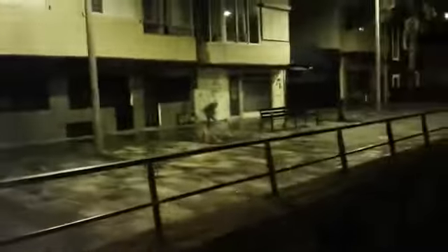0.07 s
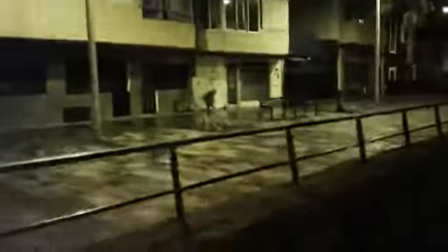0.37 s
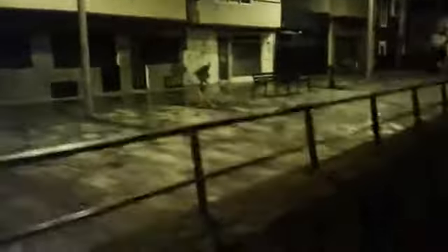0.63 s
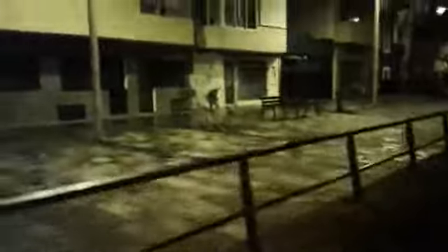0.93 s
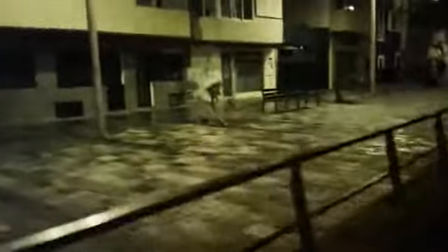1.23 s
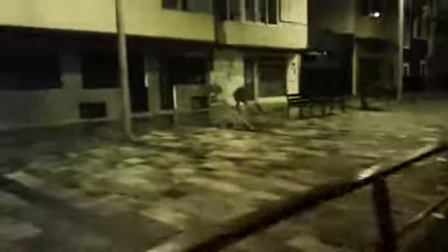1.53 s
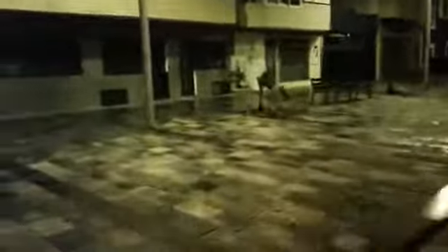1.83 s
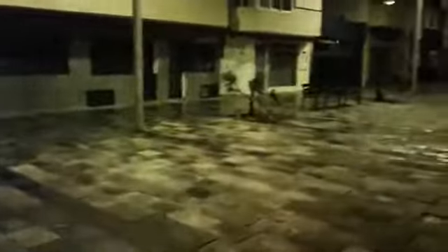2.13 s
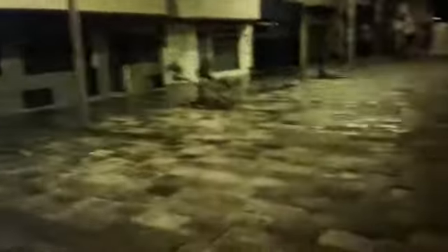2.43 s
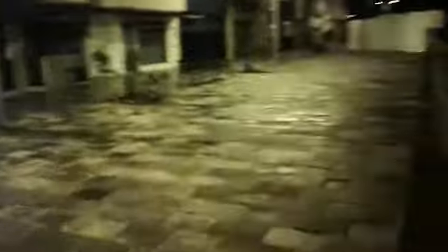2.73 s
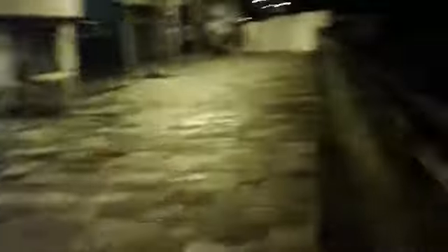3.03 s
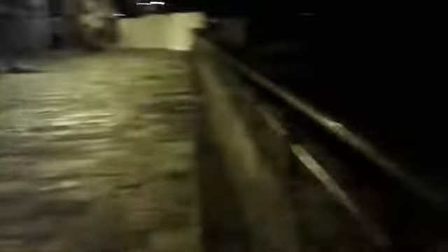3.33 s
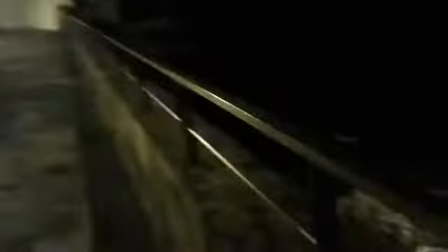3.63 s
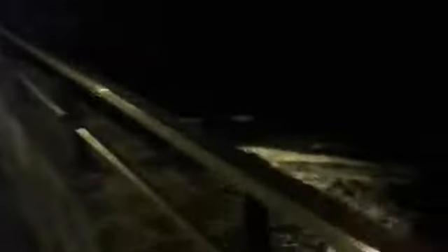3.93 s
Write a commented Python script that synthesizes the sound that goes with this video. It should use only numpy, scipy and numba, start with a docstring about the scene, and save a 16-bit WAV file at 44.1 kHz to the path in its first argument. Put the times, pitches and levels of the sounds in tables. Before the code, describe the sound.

Gusts of wind rumble and bump against the microphone, with sea surf rushing behind.

```python
"""A seaside promenade at night: wind buffets a camera's microphone over the wash of surf.
At first the surf is loudest, broken by brief gusts; each eddy is a low thump, brighter when fast.
Just before halfway the wind picks up while the surf sinks.
Near the end the wind tears hardest and the surf swells again;
the camera's gain control ducks the surf under the strong blows."""
import sys
import numpy as np
from scipy import signal
from scipy.fft import rfft, irfft, next_fast_len
from scipy.io import wavfile
from scipy.ndimage import uniform_filter1d, minimum_filter1d, map_coordinates
from numba import njit

SR = 44100
rng = np.random.default_rng(int(sys.argv[2]) if len(sys.argv) > 2 else 0)


def transcribe(signal):
    """Save signal, clipped to [-1, 1], as a 16-bit WAV file at the path in sys.argv[1]."""
    frames = np.atleast_2d(signal).T
    limited = np.clip(frames, -1, 1)
    pcm = np.round(limited * 32767).astype(np.int16)
    wavfile.write(sys.argv[1], SR, pcm)


N = 176400  # 4 s


def wind_buffeting(octaves_per_db=0.1412):
    """Turbulent pressure at the microphone; the strongest flow sets the corner, swells are brighter."""
    flow_power, flow_weighted_hz = steady_flow(octaves_per_db)
    eddy_power, eddy_weighted_hz, kicks = eddies()
    power = flow_power + eddy_power
    mean_corner_hz = (flow_weighted_hz + eddy_weighted_hz) / power
    ragged_db = 2.5 * wobble(rate_hz=220)  # fine break-up of all the flow
    corner_hz = mean_corner_hz * 2 ** (octaves_per_db * ragged_db)
    step_rad = np.minimum(2 * np.pi * corner_hz / SR, 0.5)
    turbulence = np.sqrt(power) * amp(ragged_db) * rng.standard_normal(N)
    drive = 2 * (turbulence + kicks) / np.sqrt(step_rad)  # level independent of corner
    return moving_lowpass(drive, step_rad, damping=1.407, stages=2)


# Steady wind on the microphone: time_s, level_db, corner_hz
FLOW_CURVE = [(0, -42, 300), (.07, -46, 300), (.12, -25, 280), (.26, -29, 280), (.34, -45.5, 250),
              (.8, -42, 250), (1.0, -43, 248), (1.15, -21, 258), (1.3, -44.5, 250), (1.63, -53, 250),
              (1.68, -20, 318), (2.1, -23.5, 268), (2.38, -21.5, 280), (2.52, -29.5, 252),
              (2.75, -20.5, 306), (2.92, -28.5, 283), (3.02, -21.5, 353), (3.25, -24, 352),
              (3.46, -13.5, 770), (3.68, -15, 645), (3.8, -20, 526), (3.85, -29, 285), (4, -20, 320)]


def steady_flow(octaves_per_db, gain_db=0.5):
    """Airflow with random swells: its power and power-weighted corner."""
    level_db, corner_hz = curves(FLOW_CURVE)
    swell_db = 3 * wobble(rate_hz=35)
    power = amp(gain_db + level_db + swell_db) ** 2
    return power, power * corner_hz * 2 ** (octaves_per_db * swell_db)


# Eddies hitting the microphone: centre_s, length_s, level_db, corner_hz
EDDY_HITS = [(.091, 0.002, -0.5, 960), (.107, 0.0089, -9, 786), (0.126, 0.0088, -6.5, 780),
             (0.136, 0.0034, -10, 660), (0.148, .005, -7.5, 350), (0.181, 0.013, -10, 438),
             (0.214, 0.0095, -16.5, 450), (0.252, 0.028, -16, 400), (0.636, .012, -14.5, 345),
             (0.849, 0.011, -15.5, 500), (.865, 0.0057, -11.5, 516), (0.888, 0.012, -15, 338),
             (1.069, 0.0027, -9.5, 650), (1.075, 0.0029, -3.5, 890), (1.096, 0.0079, -8, 780),
             (1.152, 0.003, -7.5, 398), (1.16, 0.0092, -10, 412), (1.198, .008, -15.5, 303),
             (1.222, 0.022, -11.5, 420), (1.328, 0.021, -27.5, 300), (1.665, 0.01, -9.5, 570),
             (1.71, 0.045, -12, 546), (1.758, 0.0088, -10, 720), (1.786, 0.02, -11, 486),
             (1.827, 0.0049, -10.5, 556), (1.842, 0.0037, -9, 634), (1.912, 0.002, 3, 1460),
             (1.918, 0.0074, -4.5, 840), (1.955, .009, -3, 1580), (1.973, 0.014, -8, 1210),
             (2.031, 0.037, -11, 780), (2.056, 0.02, -13.5, 646), (2.098, 0.0065, -16, 712),
             (2.171, 0.01, -11, 443), (2.199, 0.013, -16.5, 486), (2.238, 0.016, -13.5, 484),
             (2.294, 0.0082, -8.5, 680), (2.387, 0.051, -16.5, 530), (2.409, 0.0061, -4, 1160),
             (2.581, 0.0048, -10.5, 830), (2.607, 0.019, -21, 620), (2.644, 0.011, -17, 553),
             (2.71, 0.0055, -11, 730), (2.722, 0.0053, -7.5, 880), (2.762, 0.027, -18, 760),
             (2.778, .002, -5.5, 1540), (2.813, 0.02, -16, 600), (2.958, 0.011, -11, 716),
             (2.974, 0.0023, -9.5, 850), (2.997, 0.013, -11, 695), (3.016, 0.0047, -11.5, 666),
             (3.061, 0.0037, -12, 720), (3.126, 0.014, -11.5, 720), (3.141, 0.02, -10.5, 840),
             (3.198, .002, -10, 870), (3.219, .002, -10.5, 780), (3.283, 0.0029, -5, 905),
             (3.295, 0.011, -7, 1540), (3.315, 0.0057, -4.5, 900), (3.351, 0.0074, -2, 2060),
             (3.363, 0.0039, -5, 2070), (3.4, 0.018, -13, 880), (3.45, .012, 0.5, 1960),
             (3.479, 0.014, -2.5, 1050), (3.497, 0.013, -4.5, 2060), (3.511, 0.0065, -5, 1650),
             (3.559, .002, -6.5, 1100), (3.58, 0.012, -0.5, 1370), (3.596, 0.015, -6, 1510),
             (3.641, 0.021, -9.5, 970), (3.747, 0.046, -8.5, 1120), (3.773, 0.012, -14, 1000),
             (3.795, 0.023, -12.5, 805)]


def eddies(burst_gain_db=-3.5, kick_gain_db=-0.5):
    """Each eddy is a bell-shaped burst of turbulence with one pressure kick at its centre."""
    time_s = np.arange(N) / SR
    power, weighted_hz, kicks = np.zeros((3, N))
    for centre_s, length_s, level_db, corner_hz in EDDY_HITS:
        bell = np.exp(-(2 * (time_s - centre_s) / length_s) ** 2)
        burst_power = amp(burst_gain_db + level_db) ** 2 * bell
        power += burst_power
        weighted_hz += burst_power * corner_hz
        kicks[int(centre_s * SR)] = amp(kick_gain_db + level_db) * np.sqrt(2 * SR / corner_hz)
    return power, weighted_hz, kicks


# Whole surf: time_s, level_db
SURF_CURVE = [(0, -29.5), (.12, -32), (.22, -30), (.4, -34), (.75, -33.5), (.93, -32), (1.04, -31.5),
              (1.22, -34.5), (1.4, -39.5), (1.62, -40), (1.85, -40.5), (2.1, -48.5), (2.35, -44.5),
              (2.55, -49.5), (2.72, -47.5), (2.87, -44.5), (3.02, -49.5), (3.22, -45.5), (3.45, -41),
              (3.75, -38), (3.94, -38), (4, -41)]
# Extra gain on the surf's body: time_s, gain_db
BODY_CURVE = [(0, 1), (.5, -0.5), (1.1, -0.5), (1.6, 1.5), (2.2, 2), (2.9, 3), (3.4, 0), (3.9, -3)]
# Spectrum of the body: frequency_hz, density_db
BODY_SPECTRUM = [(30, -47), (80, -16), (200, -5.5), (400, -4.5), (800, -1), (1300, -2.5), (1900, -1.5),
                 (2700, -5.5), (3700, -7.5), (5000, -16), (7000, -18.5), (15000, -50)]
# Spectrum of the foam's fizz: frequency_hz, density_db
FIZZ_SPECTRUM = [(2000, -41), (5000, -22), (6400, -14.5), (7700, -2), (8900, 1.5), (10000, -2),
                 (11500, -10), (13500, -12), (15000, -15)]


def surf(body_gain_db=8, fizz_gain_db=1.5):
    """The wash of broken waves: a rushing body and the fizz of foam."""
    level_db, = curves(SURF_CURVE)
    extra_db, = curves(BODY_CURVE)
    body_db = body_gain_db + extra_db + 0.26 * wobble(rate_hz=12)
    body = amp(body_db) * patchy_noise(BODY_SPECTRUM, patchy_db=0.87)
    fizz_db = fizz_gain_db + 0.25 * wobble(rate_hz=22)
    fizz = amp(fizz_db) * patchy_noise(FIZZ_SPECTRUM, patchy_db=0.1)
    return amp(level_db) * (body + fizz)


def ducking(wind, threshold=0.48, slope=1.06, range_db=6.5, ahead_s=0.02, release_s=0.064):
    """Camera gain that drops just ahead of each strong wind peak and recovers smoothly."""
    excess = (np.abs(wind) / threshold) ** slope
    depth_nepers = np.log(np.clip(excess, 1, amp(range_db))) + 1e-12
    decay = np.arange(N) / SR / release_s
    held_nepers = np.exp(np.maximum.accumulate(np.log(depth_nepers) + decay) - decay)  # decaying peak hold
    width = int(ahead_s * SR)
    early_gain = minimum_filter1d(np.exp(-held_nepers), width, origin=-(width // 2))
    return uniform_filter1d(early_gain, width // 2)


def amp(db):
    """Decibels to gain."""
    return 10 ** (np.asarray(db) / 20)


def unit_rms(x):
    """Scale to rms 1."""
    return x / np.sqrt(np.mean(x ** 2) + 1e-20)


def curves(rows):
    """One value per sample for each column after the time."""
    time_s, *columns = np.transpose(rows)
    return [np.interp(np.arange(N) / SR, time_s, column) for column in columns]


def wobble(rate_hz):
    """A smooth curve through random knots."""
    return map_coordinates(rng.standard_normal(4096), [np.arange(N) * rate_hz / SR], mode="wrap")


def filtered(x, response):
    """Scale the spectrum of x by response(hz)."""
    size = next_fast_len(N + 8192)
    return irfft(rfft(x, size) * response(np.fft.rfftfreq(size, 1 / SR)), size)[..., :N]


def patchy_noise(spectrum, patchy_db):
    """Coloured noise of rms 1 with random gain patches in time and frequency."""
    cells = signal.stft(rng.standard_normal(N), nperseg=512)[2]
    patches = uniform_filter1d(rng.standard_normal(cells.shape), 6, axis=0)
    patches = unit_rms(uniform_filter1d(patches, 14, axis=1))
    noise = signal.istft(cells * amp(patchy_db * patches), nperseg=512)[1][:N]
    knot_hz, knot_db = np.transpose(spectrum)
    coloured = filtered(noise, lambda hz: amp(np.interp(np.log(hz + 1), np.log(knot_hz), knot_db)))
    return unit_rms(coloured)


@njit
def moving_lowpass(x, step_rad, damping, stages):
    """A chain of two-pole low-passes; step_rad is the corner in radians per sample."""
    low, band, y = np.zeros(stages), np.zeros(stages), np.zeros(len(x))
    for i in range(len(x)):
        sample = x[i]
        for k in range(stages):
            low[k] += step_rad[i] * band[k]
            band[k] += step_rad[i] * (sample - low[k] - damping * band[k])
            sample = low[k]
        y[i] = sample
    return y


def scene(mic_cut_hz=87.3, rumble_cut_hz=57):
    """High-passed wind over ducked surf at one microphone, alike in both channels."""
    mic_rolloff = signal.butter(2, mic_cut_hz, "high", fs=SR, output="sos")
    rumble_filter = signal.butter(1, rumble_cut_hz, "high", fs=SR, output="sos")
    wind = signal.sosfilt(mic_rolloff, wind_buffeting())
    wind = signal.sosfilt(rumble_filter, wind)
    return np.tile(wind + surf() * ducking(wind), (2, 1))


def record(dry, ceiling=0.95, limiter_s=0.0031, top_hz=15150):
    """The camera's fast peak limiter, then its band limit."""
    width = int(limiter_s * SR)
    needed_gain = ceiling / np.maximum(np.abs(dry[0]), ceiling)
    gain = uniform_filter1d(minimum_filter1d(needed_gain, width), width)
    return filtered(dry * gain, lambda hz: hz < top_hz)


dry = scene()
out = record(dry)
transcribe(out)
```